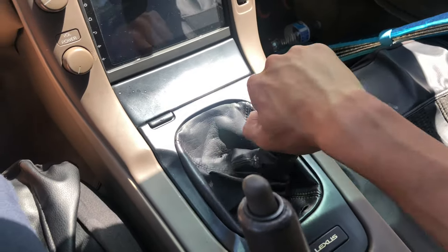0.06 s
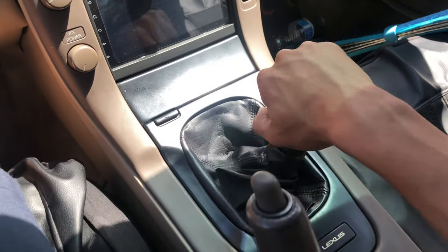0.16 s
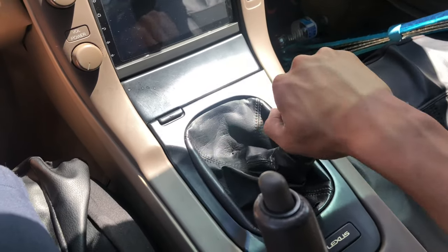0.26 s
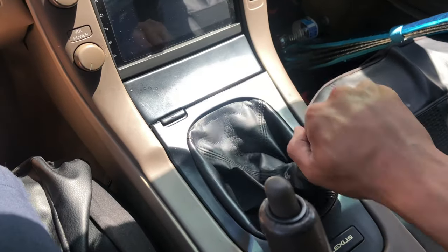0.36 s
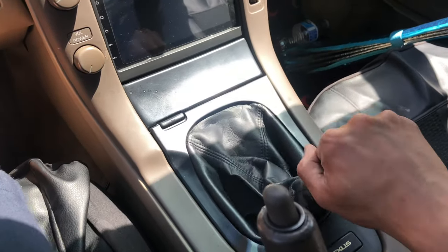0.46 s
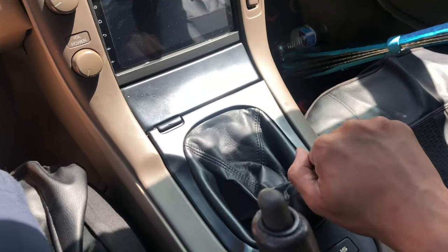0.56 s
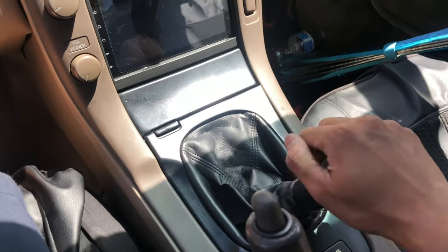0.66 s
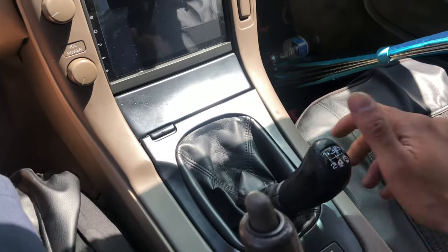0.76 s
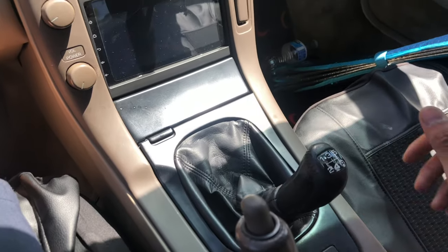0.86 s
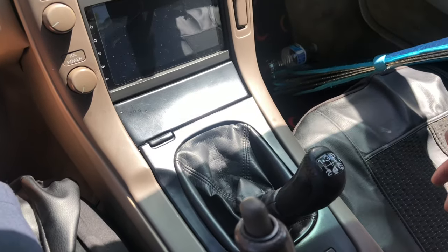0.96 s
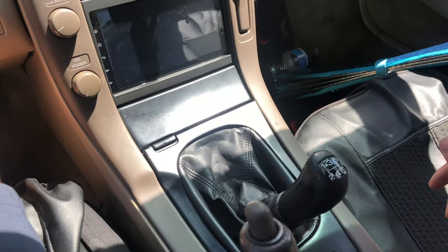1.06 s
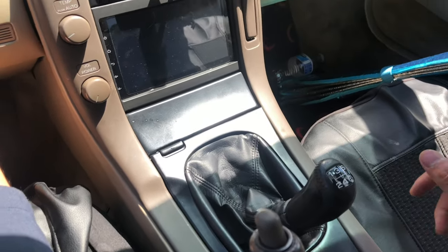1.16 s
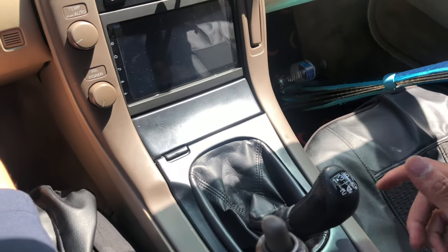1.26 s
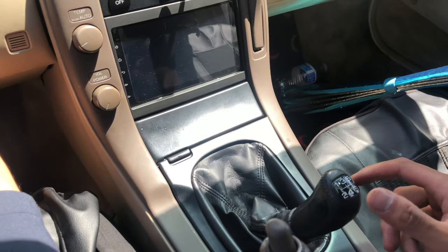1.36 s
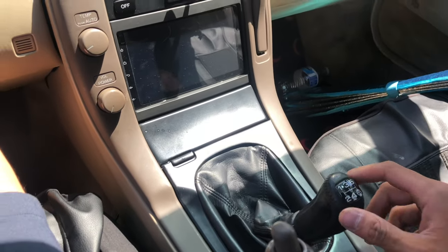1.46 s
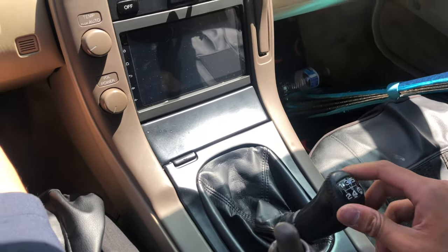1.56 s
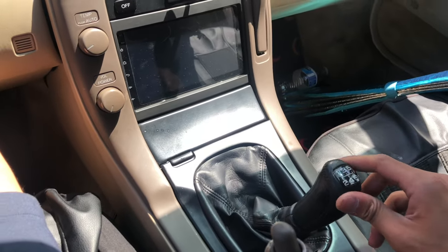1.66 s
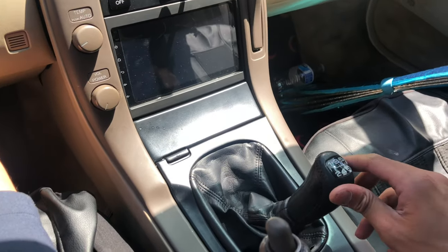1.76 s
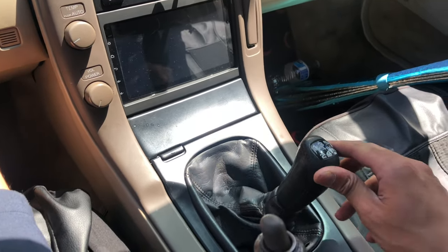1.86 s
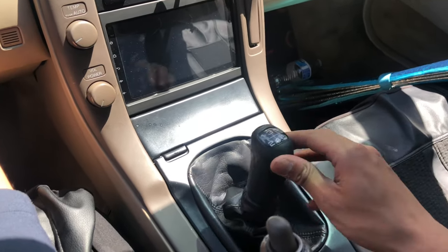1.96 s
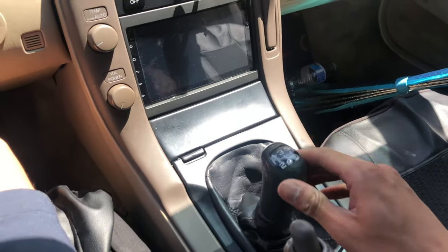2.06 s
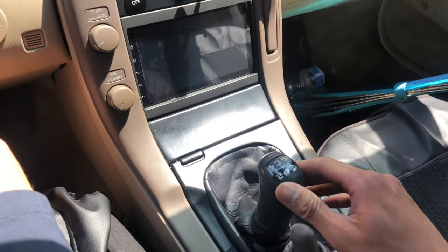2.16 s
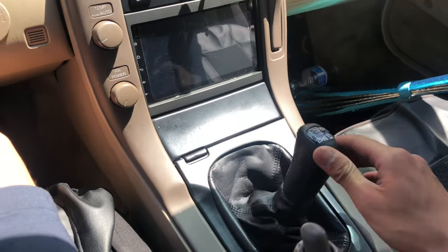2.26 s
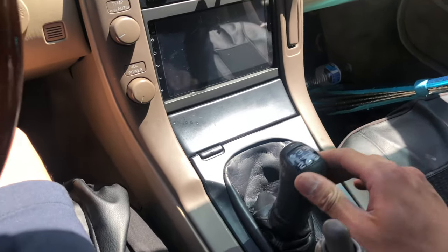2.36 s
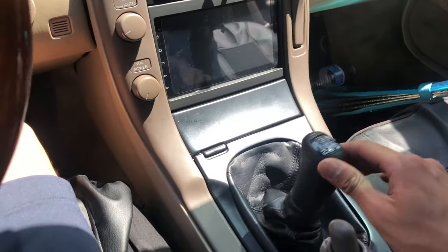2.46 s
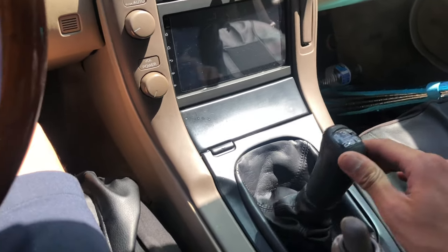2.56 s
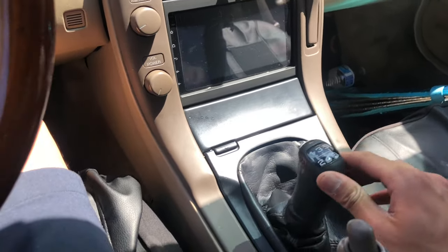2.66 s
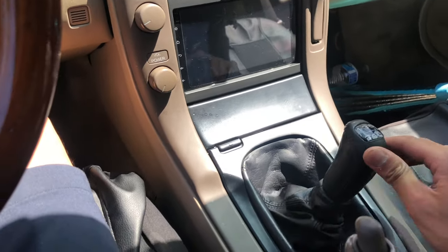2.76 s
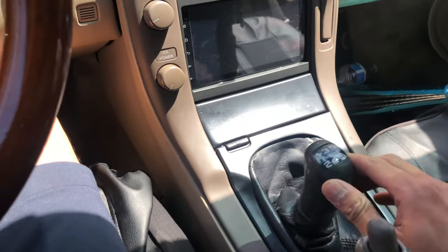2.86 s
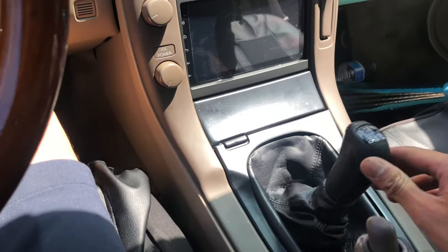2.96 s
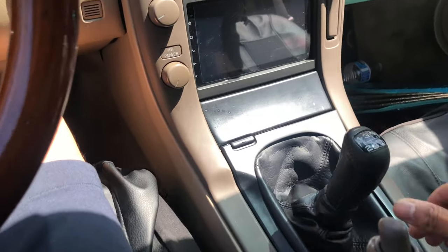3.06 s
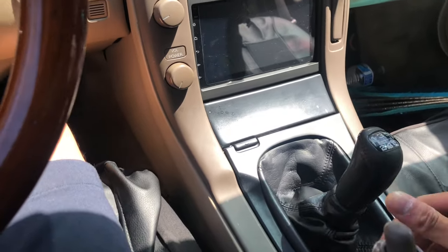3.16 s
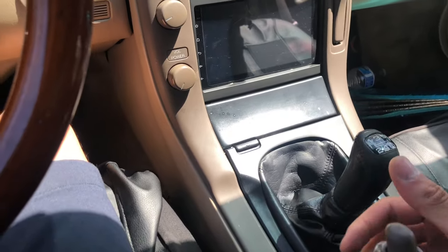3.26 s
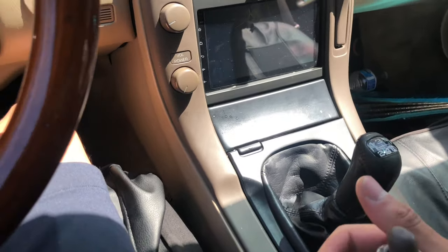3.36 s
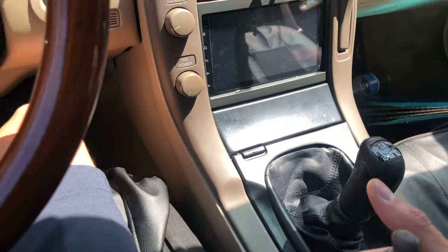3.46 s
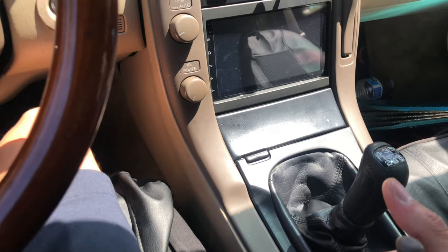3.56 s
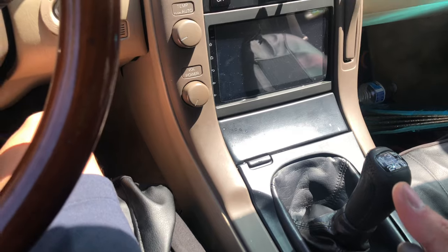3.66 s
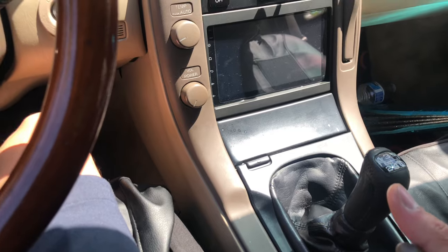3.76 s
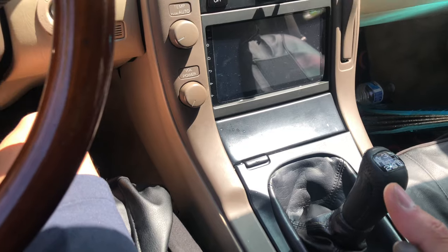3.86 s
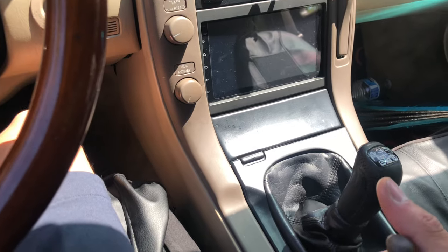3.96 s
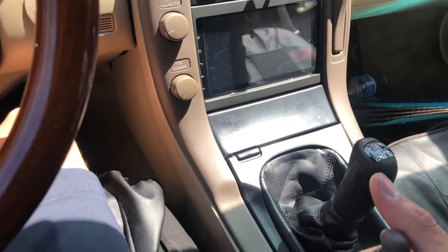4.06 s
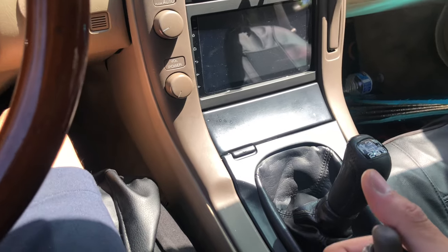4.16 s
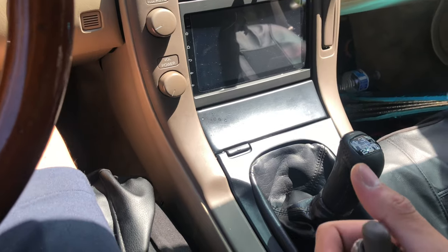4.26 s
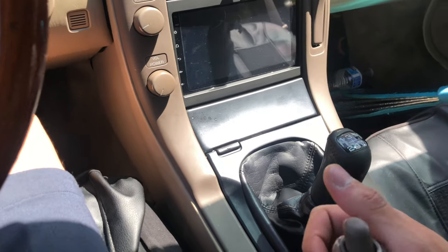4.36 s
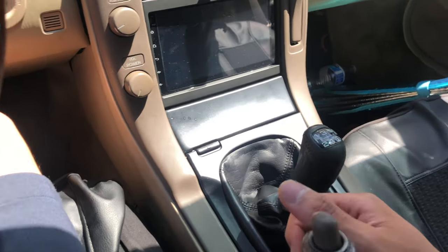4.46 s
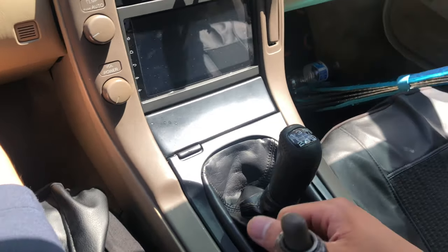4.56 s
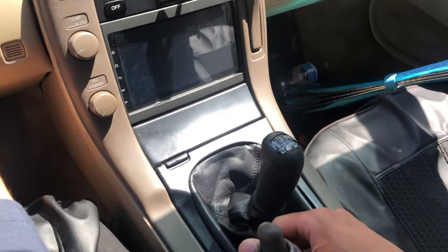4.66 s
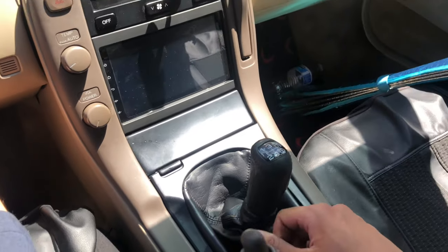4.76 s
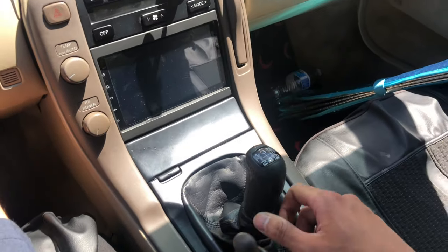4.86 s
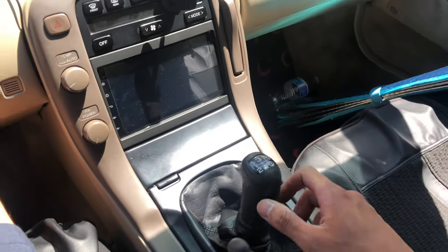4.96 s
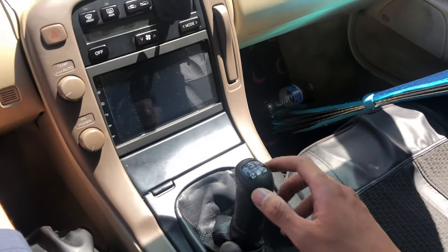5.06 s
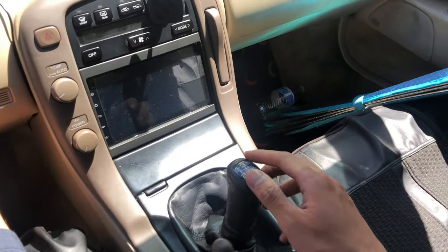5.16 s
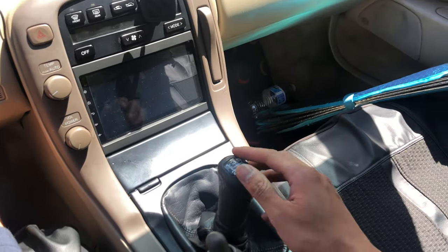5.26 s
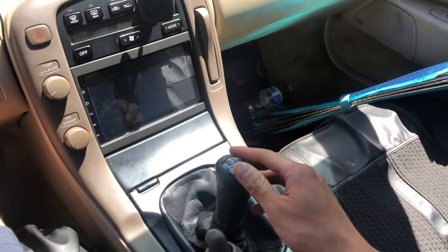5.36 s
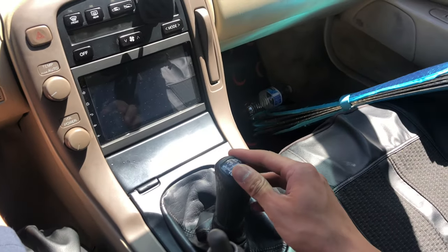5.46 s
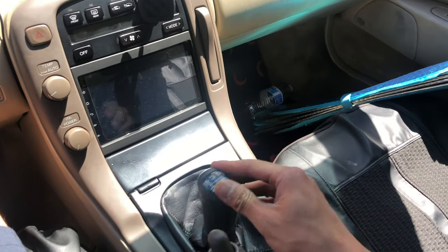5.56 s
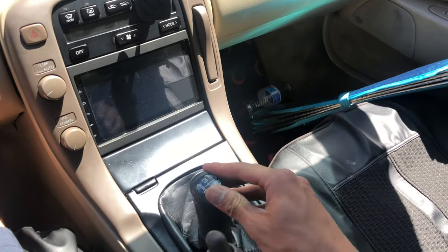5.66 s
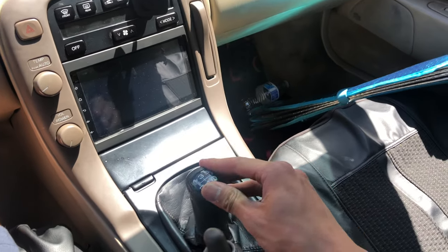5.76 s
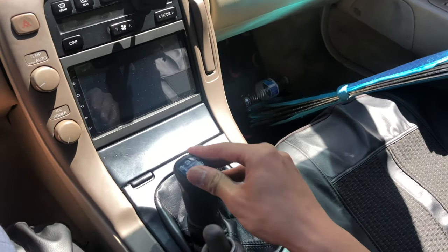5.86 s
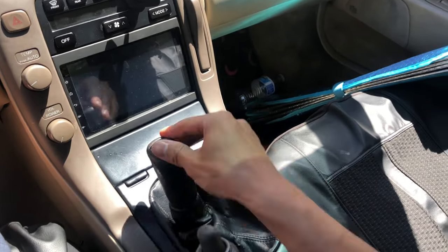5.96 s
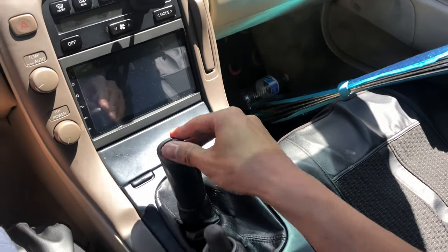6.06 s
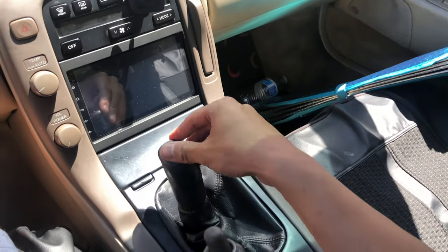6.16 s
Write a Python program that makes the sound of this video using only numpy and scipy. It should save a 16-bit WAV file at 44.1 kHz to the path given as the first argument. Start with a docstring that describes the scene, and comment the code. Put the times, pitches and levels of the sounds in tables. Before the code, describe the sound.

A hand works a manual gear lever in the small padded cabin of a parked car. It first clunks into its gates with dull console thumps, then is rocked from side to side in neutral with light clicks. After some sparse ticks, two more groups of firm clunks follow. The leather boot rubs and creaks throughout, close and fairly dry, over soft hiss, a low hum and a few faint distant whistles.

```python
"""In the small padded cabin of a parked car, a hand works the gear lever.
The lever knocks into its gates, ringing on hard hits, and thumps the console. In neutral it is rocked
from side to side, clicking over the centre detent onto rubber stops while the console rumbles.
Boot and palm rub by stick and slip, the leather creaks, the linkage ticks.
Behind it: soft hiss, a low hum and a few faint whistles from outside."""
import sys
import numpy as np
from scipy import signal
from scipy.fft import rfft, irfft, next_fast_len
from scipy.io import wavfile
from scipy.ndimage import map_coordinates

SR = 44100
rng = np.random.default_rng(int(sys.argv[2]) if len(sys.argv) > 2 else 0)


def output_pcm(signal):
    """Save a mono or channel-first signal as 16-bit PCM at the path in sys.argv[1].

    Samples are clipped to [-1, 1] before scaling.
    """
    pcm = np.clip(np.atleast_2d(signal).T, -1, 1) * 32767
    wavfile.write(sys.argv[1], SR, np.round(pcm).astype(np.int16))


N = 272979

# Noise spectra. Each row: frequency in Hz, relative density in dB.
CABIN_AIR_SPECTRUM = [(20, -35.5), (35, 5), (55, -3.5), (85, -11.5), (122, -2.5), (170, -6.5), (230, -11),
                      (450, -17.5), (1000, -26.5), (2500, -31.5), (6000, -34), (15500, -38.5)]
LEATHER_SPECTRUM = [(60, -29), (150, 10.5), (400, 12), (900, 7), (2000, 2.5), (3500, -7.5), (6000, -9),
                    (10000, -17.5), (15500, -37)]
LEVER_RUB_SPECTRUM = [(25, -21), (50, -6.5), (85, -1), (140, 1), (230, -5), (330, 0.5), (600, -6.5),
                      (900, -14), (1600, -59)]
BOOT_RASP_SPECTRUM = [(400, -8), (900, 2), (1300, -1.5), (1800, 2), (2500, -3.5), (3500, -11), (6000, -24)]
SKIN_HISS_SPECTRUM = [(2000, -40), (3300, 1.5), (5500, 3.5), (8000, -1), (11000, -3), (15500, -8.5)]
CRACK_SPECTRUM = [(200, -4), (600, -11), (1300, 15.5), (1900, 5), (3000, 1.5), (5200, -3), (9000, -8.5),
                  (15000, -20)]
CONSOLE_SWAY_SPECTRUM = [(20, -3), (36, 2), (55, 7), (110, -5), (250, -57)]
# Low hum. Each row: frequency in Hz, level in dB.
HUM_TONES = [(54, -64.5), (118.4, -67.5)]
# Sleeve and leather stirring. Each row: time in seconds, relative level in dB.
RUSTLE_LEVELS = [(0.0, -57.5), (0.52, -53.5), (1.03, -67.5), (1.33, -95), (1.91, -61), (2.05, -54.5),
                 (2.33, -57.5), (2.86, -60.5), (3.17, -54), (3.57, -71), (4.36, -65.5), (4.88, -54),
                 (5.29, -63.5), (5.71, -62), (6.09, -66), (6.19, -74)]
# Hollow under the boot. Each row: centre in Hz, width in Hz, level in dB over the plain rub.
CONSOLE_RESONANCES = [(128, 65, 6), (329, 10.4, 4), (540, 18, -8), (920, 27, -15.5), (1170, 240, -2.5),
                      (1707, 47, 0.5), (2370, 130, -5), (2970, 68, -0.5)]
# Hand on knob and boot. Each row: start and end in seconds, level in dB, slip in dB (0 grips, 20 slides).
HAND_STROKES = [(0.004, 0.09, -55, 1), (0.112, 0.179, -58, -5), (0.225, 0.415, -57.5, 4),
                (0.367, 0.466, -43, -1.5), (0.596, 0.68, -60.5, 13), (0.657, 0.742, -71, 29),
                (0.795, 0.96, -70, 14), (1.595, 1.718, -67, 8.5), (1.868, 1.952, -65.5, 13),
                (1.938, 2.005, -46.5, -1), (2.08, 2.107, -85, 10), (2.944, 3.082, -59.5, 6.5),
                (3.505, 3.713, -87, 31.5), (3.844, 3.917, -67, 11.5), (4.637, 4.712, -56.5, 0),
                (4.91, 5.084, -64, 9), (5.585, 5.642, -56, -0.5), (5.798, 5.879, -66, 16.5),
                (5.887, 5.993, -46, -3), (6.11, 6.198, -58.5, 14)]
# Linkage, knob and boot. Each row: start in seconds, relative level in dB, centre in Hz, width in octaves.
LINKAGE_TICKS = [(0.028, -36.5, 1700, 0.71), (0.1347, -46, 4460, 1.5), (0.210, -42, 1510, 1.5),
                 (0.2255, -40, 6080, 0.84), (0.2892, -33, 5900, 0.77), (0.3542, -29.5, 2820, 1.3),
                 (0.359, -25, 990, 0.64), (0.389, -30.5, 5500, 0.41), (0.446, -34.5, 3000, 2),
                 (0.4582, -32.5, 4250, 1.26), (0.6053, -30, 5250, .65), (0.6134, -30, 4400, 2.3),
                 (0.6465, -30.5, 5000, 1.8), (0.666, -37, 1335, 0.4), (0.688, -43, 1350, .6),
                 (0.716, -42, 1400, 1), (1.543, -48, 2640, 1.5), (1.9451, -31, 5080, 2.8),
                 (2.42, -31.5, 2870, 2.9), (2.7742, -41, 2600, 3.1), (2.877, -38.5, 3000, 3.5),
                 (2.984, -39.5, 2100, 0.55), (3.166, -43.5, 2770, 1.6), (3.3997, -42, 1980, 1.6),
                 (3.520, -41, 970, 1.54), (3.583, -51.5, 880, .8), (3.655, -49.5, 840, 1.1),
                 (3.787, -45.5, 1000, 1.37), (3.864, -43, 910, 0.94), (3.8984, -37.5, 2430, .6),
                 (3.909, -41, 1050, 1.9), (4.4199, -39, 1230, 1.4), (4.4786, -33.5, 1490, 0.96),
                 (4.708, -39, 1400, 2.1), (4.7148, -31, 9500, 3), (5.3691, -39.5, 2530, 1.9),
                 (5.3931, -40.5, 2730, 1.7), (5.6067, -41.5, 1560, 1.3), (5.7506, -43.5, 1040, 0.91),
                 (6.0492, -39, 1920, 1.44), (6.1175, -34, 2980, 1.8)]
# Lever on gate. Each row: start in seconds, level in dB, pitch in Hz, swell in seconds, hardness in dB.
GATE_KNOCKS = [(0.03, -42, 445, 0.0035, -24), (0.3562, -29, 746, 0.003, -6),
               (0.3648, -26.5, 324, 0.0014, -20), (0.9344, -25.5, 322, .0032, -20.5),
               (1.8624, -47.5, 550, .005, -5.5), (1.961, -49.5, 692, 0.012, 2),
               (2.093, -40.5, 300, 0.0018, -26), (2.4217, -49.5, 483, 0.0012, 7),
               (2.658, -45.5, 553, 0.003, -7), (4.049, -50.5, 226, 0.0095, -26),
               (4.4807, -41, 555, 0.003, -7), (4.692, -30.5, 287, 0.005, -14),
               (4.7111, -23, 265, .0048, -7), (4.7205, -30, 550, 0.0021, -14),
               (4.7245, -25, 284, 0.0043, -21), (5.005, -36.5, 292, 0.0032, -7.5),
               (5.165, -42.5, 325, 0.002, -10.5), (5.839, -42.5, 598, 0.0042, -1.5),
               (5.8993, -28, 697, 0.0012, -11.5), (5.972, -30.5, 732, 0.0041, 4.5),
               (5.9808, -27.5, 244, 0.0036, -26)]
# Lever and gate ringing. Each row: frequency in Hz, relative level in dB, T60 in seconds.
LEVER_MODES = [(229, -4.5, 0.11), (293.4, -11, 0.11), (350, -6.5, 0.08), (458, -2, 0.056),
               (561, -4.5, 0.078), (703, -1, 0.059), (820, 0.5, 0.03), (1046, -6.5, 0.061),
               (1260, -12, 0.059), (1552, -6, 0.031), (1616, -12, 0.056), (1840, -24, 0.058),
               (2650, -11, 0.022), (3430, -13, 0.027), (3550, -12.5, 0.017), (4860, -9.5, 0.018),
               (5360, -14, 0.013), (7300, -15.5, 0.018), (9100, -19, 0.02)]
# Console taking the load. Each row: start in seconds, peak in dB, pitch in Hz.
CONSOLE_THUMPS = [(0.385, -55, 139.4), (0.457, -42, 58), (0.948, -32.5, 88), (3.406, -35, 130.5),
                  (3.441, -40.5, 140), (4.72, -33.5, 128), (4.738, -31, 76), (4.815, -37, 72),
                  (5.01, -31, 117), (5.186, -45, 115), (5.615, -47, 125.5), (5.908, -26.5, 73),
                  (5.981, -34.5, 109), (6.04, -37.5, 96)]
# Notes from outside. Each row: start in seconds, hold in seconds, pitch in Hz, relative level in dB.
WHISTLE_NOTES = [(0.485, 0.13, 1700, -60.5), (2.055, 0.033, 824, -57), (2.096, 0.056, 1730, -73),
                 (2.22, 0.054, 1216, -53), (2.42, 0.034, 900, -56.5), (4.813, 0.027, 1244, -53),
                 (4.87, 0.079, 1260, -58.5), (4.989, 0.085, 1110, -56), (5.179, 0.016, 837, -62.5),
                 (5.418, 0.016, 800, -61)]
# Rocking in neutral. Each row: time at the detent in seconds, travel to the stop in seconds,
# rub level in dB, relative click level in dB.
NEUTRAL_ROCKS = [(1.888, 0.021, -57, -64), (2.078, 0.041, -56, -68), (2.262, 0.034, -55.5, -41.5),
                 (2.389, 0.049, -52.5, -36.5), (2.511, 0.033, -54.5, -39), (2.6475, .038, -53, -35),
                 (2.745, 0.045, -55, -40.5), (2.878, 0.048, -52, -38)]
# Cabin decay. Each row: frequency in Hz, T60 in seconds.
CABIN_DECAY = [(100, 0.33), (500, 0.076), (3000, 0.11), (12000, 0.064)]


def amp(db):
    """Decibels to gain."""
    return 10 ** (np.asarray(db) / 20)


def unit(x):
    """Scale to rms 1."""
    return x / np.sqrt(np.mean(x ** 2) + 1e-20)


def fade(t, t60_s):
    """Exponential decay, 60 dB in t60_s."""
    return np.exp(-np.log(1000) * t / t60_s)


def along(points, hz):
    """Read (Hz, value) points on a log axis."""
    point_hz, values = np.transpose(points)
    return np.interp(np.log(hz + 1), np.log(point_hz + 1), values)


def wobble(knots_per_s, size=N):
    """Smooth random curve."""
    knots = rng.standard_normal(int(size * knots_per_s / SR) + 4)
    return map_coordinates(knots, [np.arange(size) * knots_per_s / SR])


def filtered(x, response):
    """Apply the gain response(hz)."""
    size = next_fast_len(len(x) + 8192)
    return irfft(rfft(x, size) * response(np.fft.rfftfreq(size, 1 / SR)), size)[:len(x)]


def coloured(x, spectrum):
    """Apply a (Hz, dB) spectrum; rms 1."""
    return unit(filtered(x, lambda hz: amp(along(spectrum, hz))))


def add(track, start_s, sound):
    """Mix a sound into the track."""
    part = track[max(round(start_s * SR), 0):][:len(sound)]
    part += sound[:len(part)]


def background(air_db=-62, drift_db=1):
    """Soft cabin rumble and hiss with a wavering low hum."""
    t = np.arange(N) / SR
    air = amp(air_db + drift_db * wobble(3.825)) * coloured(rng.standard_normal(N), CABIN_AIR_SPECTRUM)
    hum = sum(amp(db + 2.5 * wobble(6)) * np.sin(2 * np.pi * hz * t + 1.5 * wobble(6))
              for hz, db in HUM_TONES)
    return air + hum


def console_gain(hz):
    """The hollow console lifts the bands around its resonances."""
    power = sum(amp(2 * db) / (1 + (2 * (hz - centre_hz) / width_hz) ** 2)
                for centre_hz, width_hz, db in CONSOLE_RESONANCES)
    return np.sqrt(1 + power)


def friction(spectrum, grains_per_s, grain_db, judder_db):
    """Stick and slip: a juddering rush plus snaps of leather grain, coloured by the console."""
    grains = (rng.random(N) < grains_per_s / SR) * (2 * rng.random(N) - 1)
    rush = rng.standard_normal(N) * amp(judder_db * wobble(130))
    return coloured(filtered(unit(rush) + amp(grain_db) * unit(grains), console_gain), spectrum)


def rustle(gain_db=-8, flicker_db=5):
    """Boot and sleeve keep stirring with a fine, uneven crackle."""
    level_db = np.interp(np.arange(N) / SR, *np.transpose(RUSTLE_LEVELS)) + gain_db
    level_db += flicker_db * wobble(25)
    return amp(level_db) * friction(LEATHER_SPECTRUM, grains_per_s=120, grain_db=-10.5, judder_db=2)


def hand_pressure(grip_s=0.0063, release_s=0.0052, lead_share=0.78, settle_s=0.0069):
    """Body, rasp and hiss envelopes: each stroke or rock takes hold, peaks midway and lets go."""
    t, out = np.arange(N) / SR, np.zeros((3, N))
    arch_db = np.array([[2], [4], [6]])
    slip_share = np.array([[0], [0.5], [1]])
    rocks = [(detent_s - lead_share * travel_s, detent_s + travel_s + settle_s, db, 0)
             for detent_s, travel_s, db, _ in NEUTRAL_ROCKS]
    for start_s, end_s, db, slip_db in HAND_STROKES + rocks:
        active = (t > start_s - 10 * grip_s) & (t < end_s + 10 * release_s)
        grip = (1 + np.tanh((t[active] - start_s) / grip_s)) / 2
        release = (1 + np.tanh((end_s - t[active]) / release_s)) / 2
        progress = (t[active] - start_s) / (end_s - start_s)
        arch = amp(-arch_db * (2 * progress - 1) ** 2)
        out[:, active] += amp(db + slip_db * slip_share) * grip * release * arch
    return out


def rubs(rasp_db=-7, hiss_db=-14):
    """A stroke rumbles in the lever, rasps and creaks in the boot and hisses on the skin."""
    envelopes = hand_pressure() * amp([[0], [rasp_db], [hiss_db]])
    body = friction(LEVER_RUB_SPECTRUM, grains_per_s=260, grain_db=-4, judder_db=2)
    rasp = friction(BOOT_RASP_SPECTRUM, grains_per_s=200, grain_db=0, judder_db=2.5)
    hiss = friction(SKIN_HISS_SPECTRUM, grains_per_s=300, grain_db=-5, judder_db=1.5)
    return np.sum(envelopes * [body, rasp, hiss], axis=0) + creaks(envelopes[1])


def snaps(rows, gain_db=-11, scatter_db=1.5, rise_s=0.00049, lead_s=0.0022, t60_s=0.02, ref_hz=1930):
    """Small parts touch: a band-limited snap, then scatter from the trim, shorter at higher pitch."""
    out, t = np.zeros(N), np.arange(SR // 8) / SR
    age_s = np.maximum(t - lead_s, 0)
    for start_s, db, centre_hz, width_oct in rows:
        band = lambda hz: 1 / (1 + (np.log2((hz + 1) / centre_hz) / width_oct) ** 2) ** 3
        envelope = fade(age_s, t60_s * (ref_hz / centre_hz) ** 0.48) * (1 - np.exp(-age_s / rise_s))
        snap = filtered(signal.unit_impulse(len(t), round(lead_s * SR)), band)
        scatter = filtered(rng.standard_normal(len(t)) * envelope, band)
        tick = snap / np.linalg.norm(snap) + amp(scatter_db) * scatter / np.linalg.norm(scatter)
        add(out, start_s - lead_s, amp(db + gain_db) * np.linalg.norm(envelope) * tick)
    return out


def creaks(rasp_envelope, rate_per_s=30, boost_db=13.5, spread_db=3,
           centre_hz=1860, spread_oct=0.43, width_oct=0.76, candidates=500):
    """The boot's folds snap at random, as loudly as they are rubbed."""
    position, chance = rng.random((2, candidates))
    size, pitch = rng.standard_normal((2, candidates))
    level = rasp_envelope[(position * N).astype(int)]
    db = 20 * np.log10(level + 1e-9) + boost_db + spread_db * size
    hz = centre_hz * 2 ** (spread_oct * pitch)
    rows = np.transpose([position * N / SR, db, hz, np.full(candidates, width_oct)])
    fires = (level > 0) & (chance * candidates < rate_per_s * N / SR)
    return snaps(rows[fires])


def ticks(detent_hz=1970, detent_width_oct=0.52):
    """The linkage ticks; the centre detent clicks once per rock."""
    clicks = [(detent_s, db, detent_hz, detent_width_oct) for detent_s, _, _, db in NEUTRAL_ROCKS]
    return snaps(LINKAGE_TICKS + clicks)


def knock(db, hz, swell_s, hardness_db, ring_db=-5, spread_db=1,
          crack_db=-2.5, crack_db_per_db=1.79, crack_t60_s=0.032, rise_s=0.00016):
    """A cushioned contact swells for a few cycles; a hard one also cracks and rings the lever."""
    t = np.arange(SR // 5) / SR
    mode_hz, mode_db, mode_t60_s = np.transpose(LEVER_MODES)[:, :, None]
    clunk = (t / swell_s) ** 2 * np.exp(2 * (1 - t / swell_s)) * np.sin(2 * np.pi * hz * t)
    strength = amp(mode_db + spread_db * rng.standard_normal(mode_db.shape))
    polarity = (-1) ** np.arange(len(LEVER_MODES))[:, None]
    ring = -np.sum(polarity * strength * fade(t, mode_t60_s) * np.sin(2 * np.pi * mode_hz * t), axis=0)
    crack = coloured(rng.standard_normal(len(t)), CRACK_SPECTRUM) * fade(t, crack_t60_s)
    metal = amp(hardness_db + ring_db) * ring + amp(crack_db_per_db * hardness_db + crack_db) * crack
    return amp(db) * (clunk + metal * (1 - np.exp(-t / rise_s)))


def lever_knocks(stop_over_rub_db=3.5):
    """The lever hits its gates, and a rubber stop at the end of each rock."""
    out = np.zeros(N)
    for start_s, db, hz, swell_s, hardness_db in GATE_KNOCKS:
        add(out, start_s, knock(db, hz, swell_s, hardness_db))
    for detent_s, travel_s, rub_db, _ in NEUTRAL_ROCKS:
        stop = knock(rub_db + stop_over_rub_db, hz=540, swell_s=0.0039, hardness_db=-15)
        add(out, detent_s + travel_s, stop)
    return out


def console_thumps(rise_s=0.0019, t60_s=0.11, ref_hz=112.3, overtone_ratio=1.73, overtone_db=-14,
                   nudge_hz=132, nudge_over_rub_db=7.5):
    """The loaded panel booms in two modes, longer at lower pitch; each rock nudges it too."""
    out, t = np.zeros(N), np.arange(SR * 2 // 3) / SR
    nudges = [(detent_s + travel_s, rub_db + nudge_over_rub_db, nudge_hz)
              for detent_s, travel_s, rub_db, _ in NEUTRAL_ROCKS]
    for start_s, db, hz in CONSOLE_THUMPS + nudges:
        decay = fade(t, t60_s * (ref_hz / hz) ** 2.57)
        overtone = amp(overtone_db) * decay * np.sin(2 * np.pi * hz * overtone_ratio * t)
        boom = (np.sin(2 * np.pi * hz * t) + overtone) * decay * (1 - np.exp(-t / rise_s))
        add(out, start_s, -amp(db) * boom / np.abs(boom).max())
    return out


def whistles(gain_db=-3, rise_s=0.0033, tail_t60_s=0.44):
    """Thin, distant tones, blurred and drawn out by street echoes."""
    out, t = np.zeros(N), np.arange(SR // 2) / SR
    for start_s, hold_s, hz, db in WHISTLE_NOTES:
        blur = 0.75 + 0.4 * (wobble(160, len(t)) + 1j * wobble(160, len(t)))
        envelope = (1 - np.exp(-t / rise_s)) * fade(np.maximum(t - hold_s, 0), tail_t60_s)
        tone = np.real(blur * np.exp(2j * np.pi * hz * t))
        add(out, start_s, amp(db + gain_db) * envelope * tone)
    return out


def console_sway(gain_db=-7, reach_s=0.11):
    """The moving console rumbles deeply around each rock."""
    t = np.arange(N) / SR
    load = sum(amp(db) * np.exp(-((t - detent_s) / reach_s) ** 2) for detent_s, _, db, _ in NEUTRAL_ROCKS)
    return amp(gain_db) * load * coloured(rng.standard_normal(N), CONSOLE_SWAY_SPECTRUM)


def cabin_reverb(x, delay_samples=SR // 300):
    """Seats and trim return a very short tail, shortest in the treble."""
    hz, t, noise = signal.stft(rng.standard_normal(SR // 4), SR, nperseg=256)
    decay = fade(t, along(CABIN_DECAY, hz)[:, None])
    _, tail = signal.istft(noise * decay, SR, nperseg=256)
    response = np.pad(tail / np.linalg.norm(tail), (delay_samples, 0))
    return signal.fftconvolve(x, response)[:N]


def scene(reverb_db=-10):
    """Mono mix; background and console bass stay dry."""
    low = background() + console_thumps() + console_sway()
    upper = rustle() + whistles() + lever_knocks() + ticks() + rubs()
    return (upper + amp(reverb_db) * cabin_reverb(upper) + low)[None]


def record(dry, low_cut_hz=18, top_hz=15950):
    """The microphone loses the deepest bass and all above its band limit."""
    response = lambda hz: (hz < top_hz) * hz ** 2 / (hz ** 2 + low_cut_hz ** 2)
    return np.array([filtered(x, response) for x in dry])


dry = scene()
out = record(dry)
output_pcm(out)
```